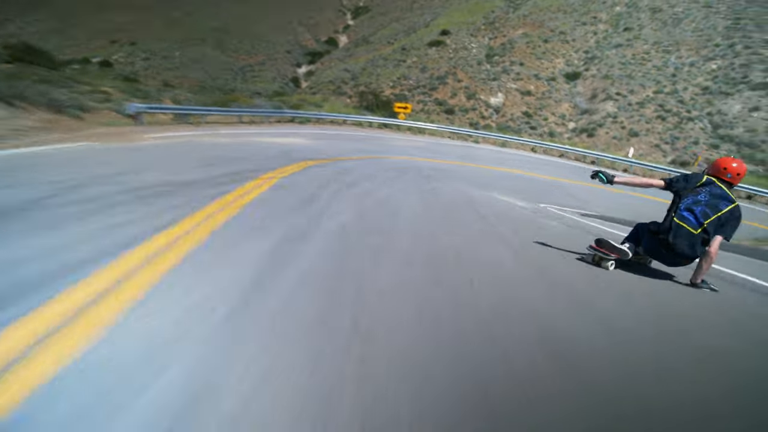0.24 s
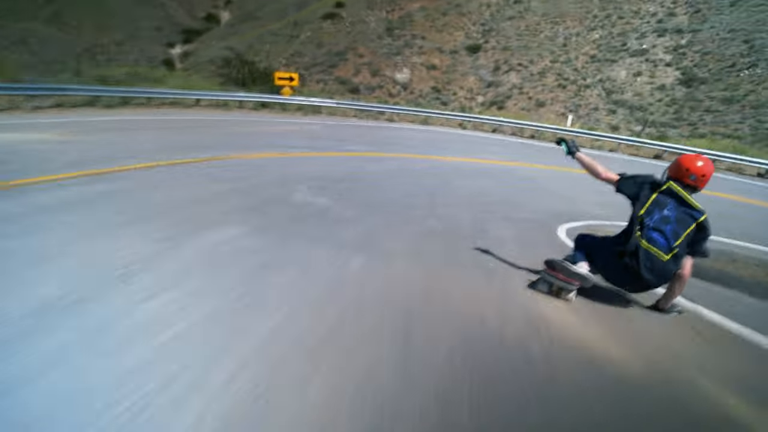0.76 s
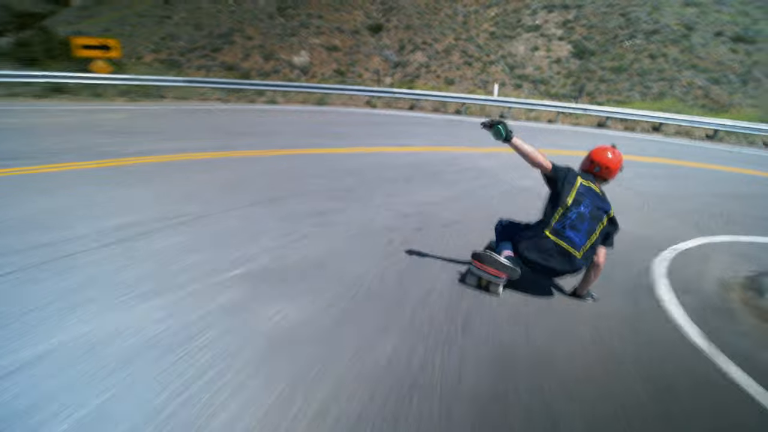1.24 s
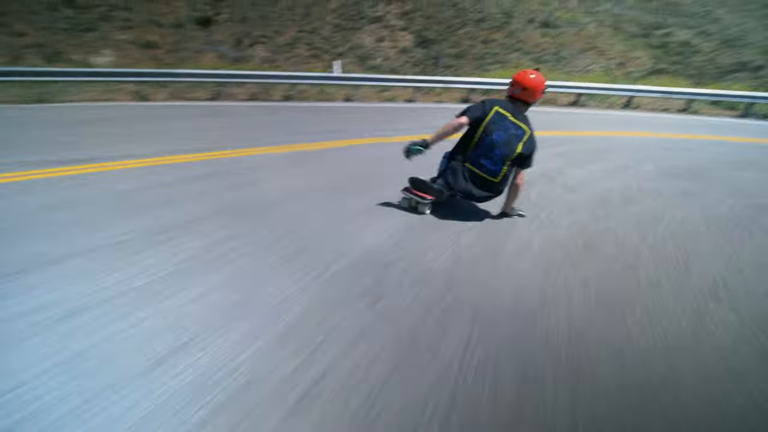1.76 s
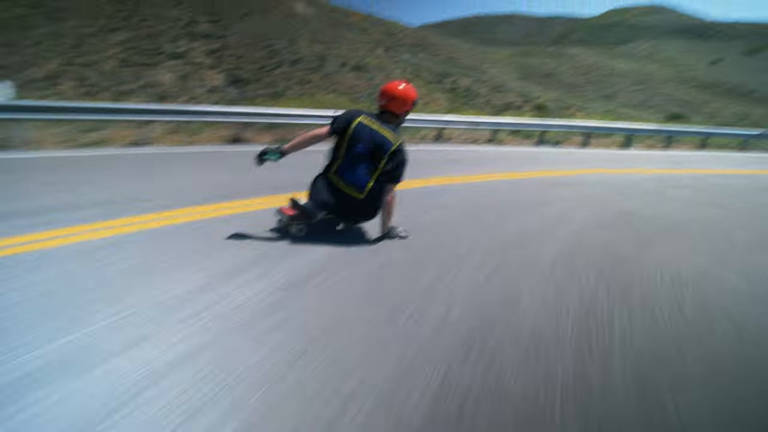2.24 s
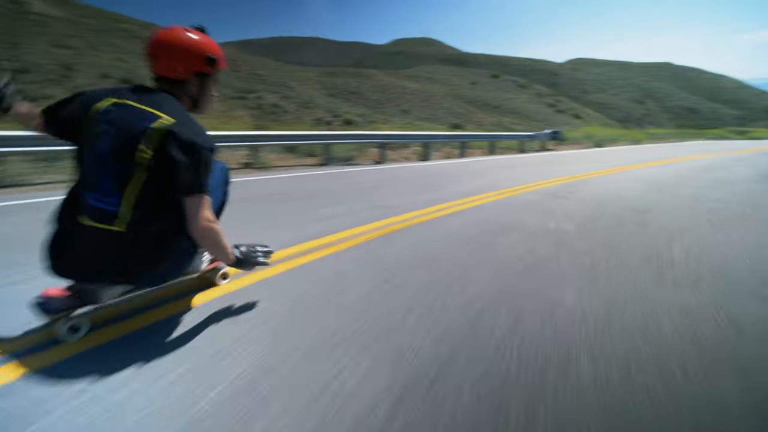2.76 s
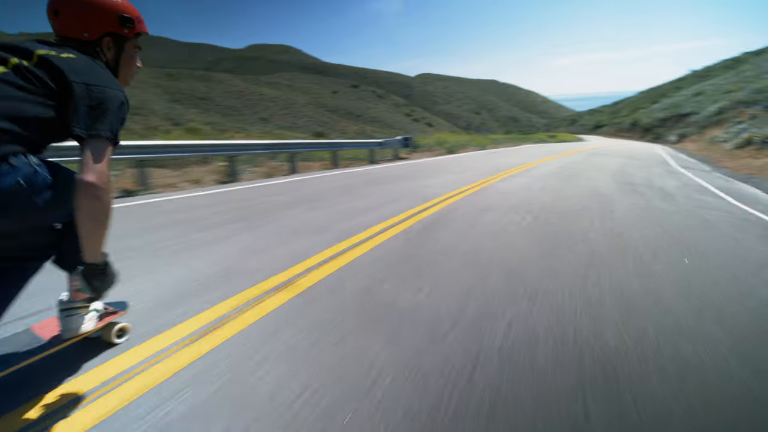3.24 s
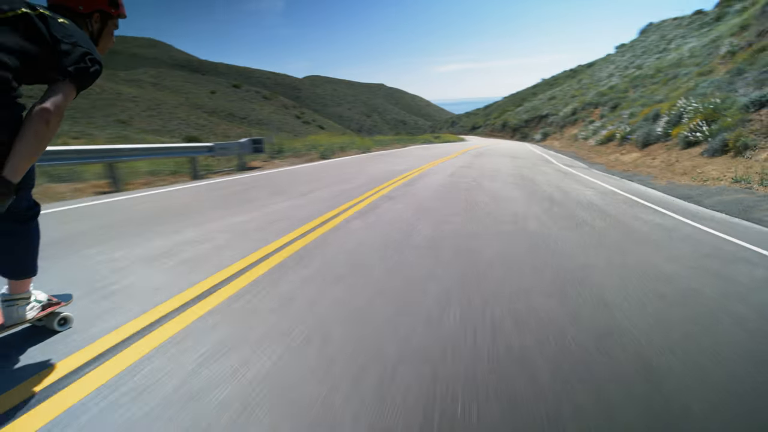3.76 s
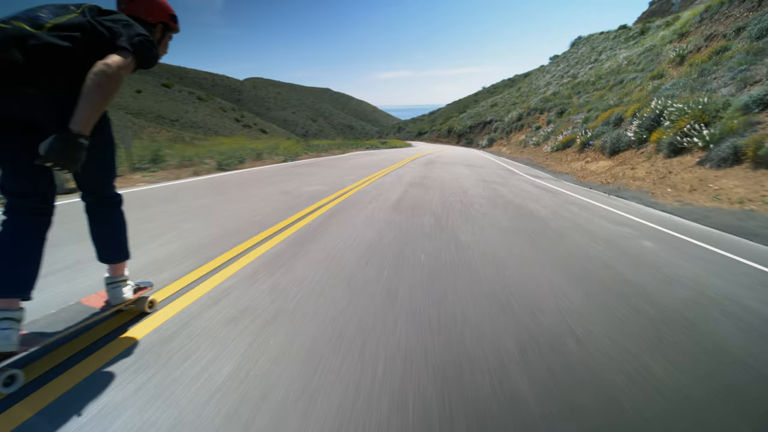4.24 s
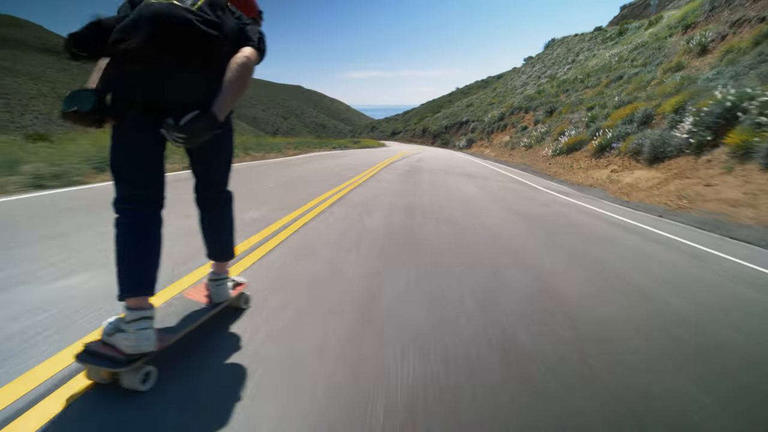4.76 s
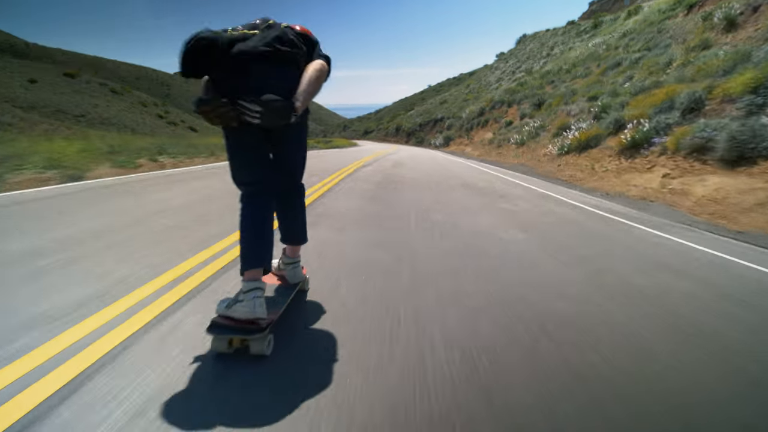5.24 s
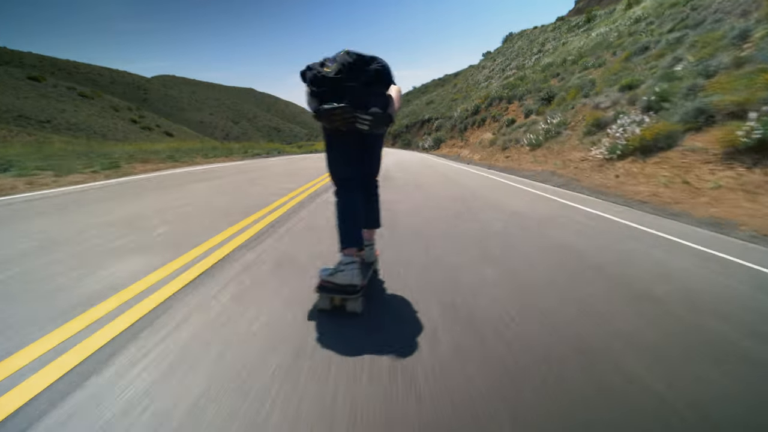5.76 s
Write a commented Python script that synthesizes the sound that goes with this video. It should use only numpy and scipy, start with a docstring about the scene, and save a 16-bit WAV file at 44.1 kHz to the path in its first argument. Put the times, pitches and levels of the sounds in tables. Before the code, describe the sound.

Outdoors on a paved hill road, a close moving microphone is thumped by low wind throughout. A glove scrapes asphalt with a burst of gritty snaps, then longboard wheels squeal in a fuzzy, wavering whistle for about a second. It breaks into short chirps and faint breathy remnants while the glove rasps and rings like hard plastic. After the scrape lifts, only a soft rolling hiss and wind remain.

```python
"""One first hears wind buffeting, the rasp of a glove on asphalt and snapping grit; the squeal of sliding wheels follows.
The squeal is stick-slip oscillation: two gliding tones with second harmonics, blurred by noise resonating at the same pitch.
The glove is shaped noise plus modes of its plastic puck struck by random grains; grit is short resonant bursts.
The longboard then rolls on with a hiss of filtered noise whose broad peak drifts, and a narrow drone.
The wind is low pressure lumps and a roar, both noise; a microphone response and a band limit shape the sum."""
import sys
import numpy as np
from scipy import signal
from scipy.fft import rfft, irfft
from scipy.io import wavfile
from scipy.ndimage import uniform_filter1d

SR = 44100
rng = np.random.default_rng(int(sys.argv[2]) if len(sys.argv) > 2 else 0)


def master_out(mix):
    """Clip the mix to full scale and print it as 16-bit PCM to the path in sys.argv[1]."""
    frames = np.transpose(np.atleast_2d(mix))
    ceiling = np.clip(frames, -1, 1)
    pcm = np.round(ceiling * 32767).astype(np.int16)
    wavfile.write(sys.argv[1], SR, pcm)


N = 264952  # length in samples

# Long slide of the wheels, before catches and flutter:
# t/s, slip rate f/Hz, level/dB, second-harmonic setting/dB, roughness (0-1)
SLIDE_CURVE = [(.205, 1045, -37, -19, .5), (.235, 1065, -29, -26, .3), (.26, 1120, -27.5, -20, .45),
               (.33, 1075, -27, -15, .55), (.366, 1025, -28, -24, .3), (.4, 1070, -26.5, -22, .3),
               (.44, 1025, -28, -20, .45), (.485, 1050, -26, -16, .2), (.56, 1085, -25.5, -27, .12),
               (.63, 1110, -24.5, -20, .15), (.69, 1075, -26, -27, .25), (.72, 1030, -27, -27, .25),
               (.768, 1055, -26, -24, .18), (.83, 1118, -24.5, -18, .08), (.865, 1108, -25.5, -22, .22),
               (.92, 1085, -26.5, -17, .3), (.95, 1122, -26, -16, .12), (1.06, 1075, -27, -20, .3),
               (1.15, 1025, -31, -24, .65), (1.2, 1000, -42, -18, 1.)]
# Moments when the wheels almost grip and the tone breaks up: t/s, dip in level/dB
CATCH_DIPS = [(.315, -7), (.415, -8), (.58, -5), (.645, -8), (.7, -14), (.846, -11), (1.005, -6), (1.1, -8),
              (1.128, -10)]
CATCH_HALF_S, ROUGHNESS_PER_DB = .008, .07  # half length/s; roughness gained for each dB of dip
# Short slips of one wheel or another, before flutter: start t/s, length/s, first f/Hz, last f/Hz,
# level/dB, second-harmonic setting/dB, roughness at the middle (0-1)
SHORT_SLIPS = [(.4, .07, 790, 900, -36.5, -13, .6), (1.234, .06, 1095, 1215, -29.5, -26, .08),
               (1.288, .03, 1070, 1035, -27, -25, .15), (1.312, .046, 1095, 1110, -26.5, -10, .05),
               (1.382, .03, 910, 895, -28.5, -14, .1), (1.372, .03, 1040, 980, -34, -8, .2),
               (1.425, .033, 990, 1000, -34, -5, .3), (1.43, .04, 865, 890, -30.5, -20, .1),
               (1.465, .048, 940, 990, -30.5, -20, .5), (1.455, .035, 1070, 1170, -31.5, -18, .55),
               (1.507, .045, 1145, 1150, -26.5, -15, .05), (1.593, .04, 1065, 1090, -31.5, -26, .2),
               (1.657, .04, 1050, 1170, -35, -22, .9), (1.712, .028, 1120, 1160, -31.5, -27, .1),
               (1.77, .12, 1150, 1130, -42, -22, .8), (2.04, .1, 1170, 1140, -42, -14, .9),
               (2.17, .11, 1080, 1050, -45, -14, .9), (2.31, .13, 1085, 1110, -38, -17, .85),
               (2.44, .1, 1060, 1030, -40, -9, 1.)]
# Each slip swells and fades over this share of its length; its ends are weaker/dB and rougher
EDGE_SHARE, EDGE_DB, EDGE_ROUGHNESS = .18, -7, .15

# Glove on the asphalt, a hard first touch and the long drag:
# t/s, level/dB, ringing f/Hz, ringing level re rasp/dB, fizz level re rasp/dB
GLOVE_DRAG = [(0.0, -34, 2600, -17, -30), (0.1, -33.5, 2630, -12, -30), (0.14, -31.5, 3180, -11, -30),
              (0.24, -31.5, 2730, -26, -31), (0.29, -42.5, 2200, -6.5, -33), (0.88, -44, 2090, -4, -42),
              (1.24, -35.5, 2550, -16, -22), (1.35, -40.5, 2330, -18, -28), (1.58, -38.5, 2780, -4, -32),
              (1.65, -34.5, 2880, -10, -18), (1.78, -36, 2840, -1.5, -20), (1.88, -38, 2800, 4, -23),
              (1.95, -39.5, 2770, -2.5, -12), (2.03, -39.5, 2660, -8, -15), (2.11, -40.5, 2700, -1, -21),
              (2.2, -41, 2560, -6.5, -8), (2.27, -36, 2350, -4, -14), (2.35, -40, 2240, -15, -22),
              (2.5, -36.5, 2210, -5, -21), (2.8, -42, 2200, -39, -15), (2.9, -59, 2170, -20, -8)]
# Spectrum of the rasp, relative: f/Hz, level per Hz/dB
RASP_SPECTRUM = [(300, -12.5), (900, 6.5), (2000, 0.5), (3500, -1), (5000, -8), (7000, -7), (10000, -12.5)]
# Upper modes of the glove's plastic puck, unpressed: f/Hz, width/Hz, relative level/dB
PUCK_MODES = [(4800, 300, 0), (6300, 400, -9)]
# The puck pressed down, so that its upper modes sing: start t/s, length/s, level/dB
PUCK_PRESSES = [(0, .28, -52), (1.42, 0.52, -56), (2.39, 0.09, -50), (2.459, 0.076, -44.5),
                (2.562, 0.092, -45)]
PRESS_SAG, PRESS_SOFT_S, LIGHT_DB = 0.016, 0.009, -55  # share of pitch lost; edge/s; light-touch level/dB
# Spectrum of the fizz in scrape and roll, relative: f/Hz, level per Hz/dB
FIZZ_SPECTRUM = [(7000, -32), (9000, -4), (11000, 22.5), (13000, 3), (16000, -15)]

# Grit that snaps under glove and wheels: start t/s, level/dB, ring f/Hz, bright part re ring/dB
GRIT_SNAPS = [(0.038, -21.5, 2900, -20), (0.084, -21, 2400, -17), (0.097, -20.5, 2700, -15),
              (0.111, -23, 2800, -12), (0.123, -23, 3600, -6), (0.15, -28, 3380, -16),
              (0.2736, -28.5, 3220, 4.5), (0.5863, -30.5, 2820, -27), (0.7127, -30.5, 3100, -4),
              (0.889, -35, 3940, -24), (1.0045, -29.5, 3140, -23), (1.1452, -25.5, 3020, -24),
              (1.179, -24.5, 2840, -13), (1.1935, -30.5, 4260, 8), (1.262, -29, 4160, -19),
              (1.27, -29, 2920, -21), (1.3384, -37, 2630, -7), (1.366, -37, 4330, 6),
              (1.629, -23.5, 2670, -18), (1.804, -24.5, 2900, -3), (1.854, -27, 2840, -4),
              (1.8746, -23, 3200, -14), (1.917, -37, 2750, -20), (1.994, -34, 2640, 9.5),
              (2.002, -34, 2640, 5), (2.183, -36.5, 2540, 8), (2.199, -33, 2550, -20),
              (2.2302, -37.5, 2540, 12), (2.276, -36, 2500, -2), (2.517, -31, 2850, -8),
              (2.903, -41.5, 3570, 16.5)]
TREBLE_DB, TREBLE_PER_BRIGHT = -15, .8  # thin treble re ring/dB, and its growth for each dB of brightness

# Wheels rolling: t/s, level/dB, hiss peak f/Hz, peak level/dB, fizz level/dB (both re level)
ROLLING = [(2.72, -54, 3730, 6, -21), (2.88, -52, 3710, -5.5, -14), (3.35, -43.5, 3750, -9.5, -37),
           (4.3, -38, 3290, -16.5, -25), (4.7, -42.5, 3960, -6, -20), (4.92, -40.5, 4850, -5.5, -25),
           (5.07, -42, 4870, -8, -31), (5.28, -39, 5080, -5.5, -37), (5.42, -42.5, 5050, -7.5, -37),
           (5.6, -44.5, 5260, -6.5, -45), (5.98, -43, 5850, -18, -40)]
# Spectrum of the rolling hiss, relative: f/Hz, level per Hz/dB
ROLL_SPECTRUM = [(400, -23), (1000, -0.5), (1400, 4.5), (1800, -6), (2300, 3.5), (3600, -6.5), (5500, -17),
                 (8000, -17), (11000, -43)]
DRONE_HZ, DRONE_WIDTH_HZ, DRONE_DB = 1790, 330, -9  # narrow band in which the rolling wheels drone

# Wind on the microphone: t/s, buffet level/dB, roar level/dB
WIND_LEVELS = [(0.0, -20.5, -32), (0.08, -17.5, -29), (0.68, -28.5, -38.5), (1.08, -27, -37),
               (1.17, -32.5, -28), (1.33, -25, -36.5), (1.66, -29, -31.5), (1.95, -21, -32),
               (3.33, -25, -33), (3.51, -19.5, -33), (3.65, -26, -31), (3.81, -21.5, -34),
               (4.31, -20.5, -29.5), (5.28, -19, -31.5), (5.95, -22.5, -35.5), (5.98, -18, -37)]
# Spectra of buffet and roar, relative: f/Hz, level per Hz/dB
BUFFET_SPECTRUM = [(12, -44.5), (22, -3), (55, 1.5), (100, -4.5), (160, -13), (260, -23.5), (600, -65)]
ROAR_SPECTRUM = [(80, -1.5), (170, -2), (300, -2), (600, -8.5), (1200, -16.5), (2200, -23), (5000, -31.5),
                 (14000, -47.5)]
# Faint sharp ticks, before the high-pass filter: t/s, impulse level/dB
TICK_TIMES = [(4.2894, -48), (5.1028, -44), (5.1074, -38), (5.2204, -39), (5.3684, -45), (5.7104, -48),
              (5.8944, -47)]
# Response of the microphone in its housing, with a notch: f/Hz, level/dB
MIC_RESPONSE = [(20, 2), (4900, 0), (5500, -4.5), (7400, -9.5), (8300, -17), (8850, -16.5), (9150, -28.5),
                (9450, -16), (10000, -13.5), (11500, -12), (12800, -15.5), (13400, -27.5), (13900, -40),
                (15000, -42)]
BAND_LIMIT_HZ = 15700


def wheels():
    """Stick-slip on a shared surface: every stretch of squeal follows the same random wander and noise."""
    drift = [wander(rate_hz=13.0) for _ in range(2)]
    tremble = [wander(rate_hz=67.0) for _ in range(2)]
    hiss = rng.standard_normal(N)
    stretches = [slide(), *(slip(*row) for row in SHORT_SLIPS)]
    return sum(squeal(rows, drift, tremble, hiss) for rows in stretches)


def slide():
    """Intermittent grip: each catch lowers the level of the long slide and roughens its tone."""
    start, end = SLIDE_CURVE[0][0], SLIDE_CURVE[-1][0]
    t = np.arange(start, end, 1 / 500)
    s, *columns = np.transpose(SLIDE_CURVE)
    hz, db, second_db, rough = (np.interp(t, s, c) for c in columns)
    dip_db = sum(depth_db * np.exp(-((t - at) / CATCH_HALF_S) ** 2) for at, depth_db in CATCH_DIPS)
    return np.transpose([t, hz, db + dip_db, second_db, rough - ROUGHNESS_PER_DB * dip_db])


def slip(start, length, first_hz, last_hz, db, second_db, rough):
    """Transient friction: one short slip swells, glides in pitch and fades."""
    share = np.array([0, EDGE_SHARE, 1 - EDGE_SHARE, 1])
    edge = np.array([1, 0, 0, 1])
    t = start + length * share
    hz = first_hz + (last_hz - first_hz) * share
    return np.transpose([t, hz, db + EDGE_DB * edge, second_db + 0 * edge, rough + EDGE_ROUGHNESS * edge])


def squeal(rows, drift, tremble, hiss):
    """Beating: two wheels stick and slip at nearly one rate; uneven asphalt blurs them into a fuzzy whistle."""
    window, columns = controls(rows)
    on = window > 0
    hz, db, second_db, rough = (c[on] for c in columns)
    rough = np.clip(rough, 0, 1)

    tone = 0
    for wheel_db, slow, fast in zip((0, -9), drift, tremble):
        wheel_hz = hz * (1 + .004 * slow[on] + .015 * fast[on])
        phase = 2 * np.pi * np.cumsum(wheel_hz) / SR
        # the sharpness of the slips flutters; reversed time gives a wander unlike that of the pitch
        sharpness_db = second_db - 3 + 7 * np.tanh(slow[::-1][on] + fast[on])
        wave = np.cos(phase) + gain_of(sharpness_db) * np.cos(2 * phase)
        tone = tone + gain_of(wheel_db + 2. * fast[::-1][on]) * wave

    fuzz = 0
    for harmonic, harmonic_db in ((1, 0.0074), (2, second_db + 5)):
        band = resonate_twice(hiss[on], harmonic * hz, harmonic * 185)
        fuzz = fuzz + gain_of(harmonic_db) * evened(band)

    out = np.zeros(N)
    # roughness trades power between tone and fuzz
    out[on] = gain_of(db) * (np.sqrt(1 - rough) * evened(tone) + np.sqrt(rough) * fuzz)
    return window * out


def scrape():
    """Modal excitation: dense grains of asphalt rasp the puck, which rings at a gliding mode and two upper ones."""
    window, (db, ring_hz, ring_db, fizz_db) = controls(GLOVE_DRAG)
    press, bend = pressure()
    rasp = noise(RASP_SPECTRUM, patchy_db=2., flicker_db=1.3, size=256)

    strength = gain_of(5.3 * np.minimum(rng.exponential(1, N), 5))
    struck = rng.random(N) < 3000 / SR  # 3000 grains a second on average
    grains = strength * struck * rng.choice([-1, 1], N)

    ring = evened(resonate_twice(grains, ring_hz, 600))
    upper = evened(sum(gain_of(mode_db) * resonate(grains, hz * bend, width)
                       for hz, width, mode_db in PUCK_MODES))
    fizz = noise(FIZZ_SPECTRUM, patchy_db=1.5, flicker_db=1.6, size=256)
    contact = gain_of(db) * (rasp + gain_of(ring_db) * ring + gain_of(fizz_db) * fizz)
    return window * (contact + press * upper)


def pressure():
    """Contact loading: each press raises the gain of the puck's upper modes while their pitch sags."""
    t = np.arange(N) / SR
    gain, bend = gain_of(LIGHT_DB), 1
    for start, length, db in PUCK_PRESSES:
        u = (t - start) / length  # 0 to 1 through the press
        on = np.clip(np.minimum(u, 1 - u) * length / PRESS_SOFT_S + .5, 0, 1)
        gain = gain + gain_of(db) * on
        bend = bend + PRESS_SAG * (.5 - np.clip(u, 0, 1)) * on
    return gain, bend


def grit():
    """Impulsive excitation: each snap is a decaying noise burst with a low ring, a bright and a thin treble part."""
    size = 2000
    out, t = np.zeros(N + size), np.arange(size) / SR
    bursts = rng.standard_normal((len(GRIT_SNAPS), size))
    for (s, db, hz, bright_db), burst in zip(GRIT_SNAPS, bursts):
        # decay of 60 dB in 25 ms behind a soft onset
        fade = gain_of(db - 60 * t / 0.025) * (1 - np.exp(-t / 0.0016))
        ring = evened(resonate(resonate(burst, hz, 3400), hz, 1800))
        bright = evened(resonate_twice(burst, 5600, 3700))
        treble = evened(resonate_twice(burst, 12000, 4000))
        treble_db = TREBLE_DB + TREBLE_PER_BRIGHT * bright_db
        snap = ring + gain_of(bright_db) * bright + gain_of(treble_db) * treble
        out[round(s * SR):][:size] += fade * snap
    return out[:N]


def roll():
    """Rolling noise: a smooth hiss of wheels, its broad peak drifting as the board moves around the microphone."""
    window, (db, peak_hz, peak_db, fizz_db) = controls(ROLLING)
    hiss = noise(ROLL_SPECTRUM, patchy_db=1.3, flicker_db=.4, size=512)
    # the echo off the road cancels a band below the peak
    hiss = hiss - 0.53 * resonate(hiss, 0.6 * peak_hz, 1200)
    drone = gain_of(DRONE_DB) * evened(resonate_twice(hiss, DRONE_HZ, DRONE_WIDTH_HZ))
    peak = evened(resonate_twice(rng.standard_normal(N), peak_hz, 1300))
    fizz = noise(FIZZ_SPECTRUM, patchy_db=1.3, flicker_db=.4, size=512)
    return window * gain_of(db) * (hiss + drone + gain_of(peak_db) * peak + gain_of(fizz_db) * fizz)


def wind():
    """Turbulent pressure: low lumps, deeper on the suction side, and the roar of air past the housing."""
    _, (buffet_db, roar_db) = controls(WIND_LEVELS)
    lumps = noise(BUFFET_SPECTRUM, patchy_db=-1.3, flicker_db=0.93, size=2048)
    lumps = evened(lumps - 0.1 * (lumps ** 2 - 1))  # the square deepens the negative side
    roar = noise(ROAR_SPECTRUM, patchy_db=0.92, flicker_db=0.5, size=1024)
    return gain_of(buffet_db) * lumps + gain_of(roar_db) * roar


def ticks():
    """Impulses: single high-passed clicks, whose spectrum is even through the treble."""
    out = np.zeros(N)
    for s, db in TICK_TIMES:
        out[round(s * SR)] = gain_of(db)
    b, a = signal.butter(2, 6000, "high", fs=SR)
    return signal.lfilter(b, a, out)


def noise(tone, patchy_db, flicker_db, size):
    """Spectral synthesis: random short-time spectra with drifting patches and a flicker shared by all bands."""
    hop = size // 4
    frames, hz = N // hop + 5, np.fft.rfftfreq(size, 1 / SR)
    a, b, patches = rng.standard_normal((frames, len(hz), 3)).T
    patches = uniform_filter1d(patches, size=size // 64, axis=0)  # smooth across frequency
    patches = evened(uniform_filter1d(patches, size=3000 // hop, axis=1))  # smooth across time
    flicker = evened(uniform_filter1d(rng.exponential(1, frames) - 1, size=3))
    level_db = read(tone, hz)[:, None] + patchy_db * patches + flicker_db * flicker
    spectra = (a + 1j * b) * gain_of(level_db)
    return evened(signal.istft(spectra, nperseg=size, noverlap=size - hop)[1][:N])


def resonate(x, hz, width):
    """Heterodyne resonance: shifts the curve hz down to zero, smooths, and shifts back with gain 1."""
    turn = np.exp(2j * np.pi * np.cumsum(hz * np.ones(len(x))) / SR)
    r = np.exp(-np.pi * width / SR)
    return 2 * (turn * signal.lfilter([1 - r], [1, -r], x / turn)).real


def resonate_twice(x, hz, width):
    """Cascaded resonance: two equal resonators in series give steeper skirts."""
    return resonate(resonate(x, hz, width), hz, width)


def wander(rate_hz):
    """Low-passed chance: a smooth random curve of about rms 1, its variation weakening above rate_hz."""
    points, points_per_s = 4096, 600
    hz = np.fft.rfftfreq(points, 1 / points_per_s)
    slow = irfft(rfft(rng.standard_normal(points)) / (1 + (hz / rate_hz) ** 4))
    return np.interp(np.arange(N) * points_per_s / SR, np.arange(points), evened(slow))


def controls(rows):
    """Linear interpolation: columns at every sample, and a soft window that is open while the table lasts."""
    s, *columns = np.transpose(rows)
    t = np.arange(N) / SR
    within = (t >= s[0]) & (t <= s[-1] + .01)
    held_to_end = (s[-1] > 5.9) & (t > 5.9)  # a table that ends past 5.9 s stays open
    window = uniform_filter1d((within | held_to_end).astype(float), size=400)
    return window, [np.interp(t, s, c) for c in columns]


def read(points, hz):
    """Logarithmic frequency scale: interpolates a spectrum along it."""
    f, value = np.transpose(points)
    return np.interp(np.log(hz + 1), np.log(f + 1), value)


def evened(x):
    """Power normalisation: scales to rms 1."""
    return x / np.sqrt(np.mean(x ** 2) + 1e-20)


def gain_of(db):
    """Level law: decibels to amplitude gain."""
    return 10 ** (np.asarray(db) / 20)


def scene():
    """Superposition: the pressures of all sources add at the one microphone."""
    return (wind() + wheels() + scrape() + roll() + grit())[None]


def record(dry):
    """Saturation and filtering: the capsule rounds crests and colours the sum; ticks join before the band limit."""
    rounded = .6 * np.tanh(dry / .6)
    hz = np.linspace(0, SR / 2, 513)
    response = signal.firwin2(1023, hz, gain_of(read(MIC_RESPONSE, hz)), fs=SR)
    coloured = signal.oaconvolve(rounded, response[None], "same")
    band_limit = signal.firwin(511, BAND_LIMIT_HZ, window=("kaiser", 9), fs=SR)
    return signal.oaconvolve(coloured + ticks(), band_limit[None], "same")


dry = scene()
out = record(dry)
master_out(out)
```